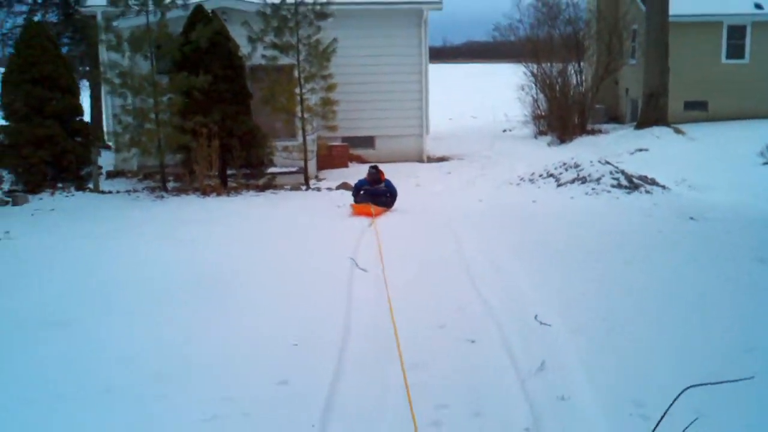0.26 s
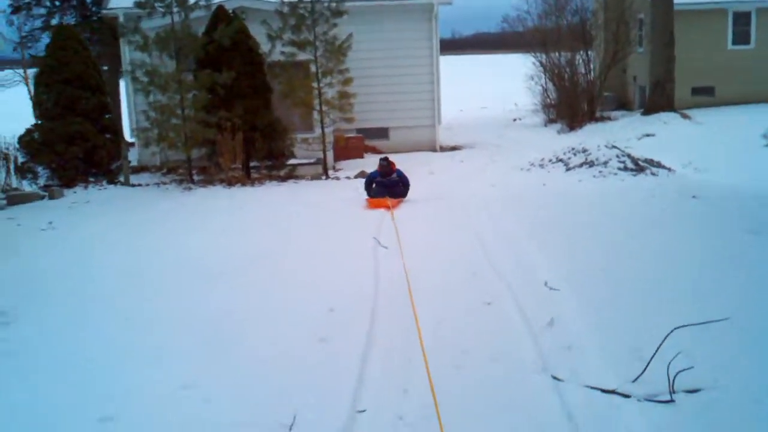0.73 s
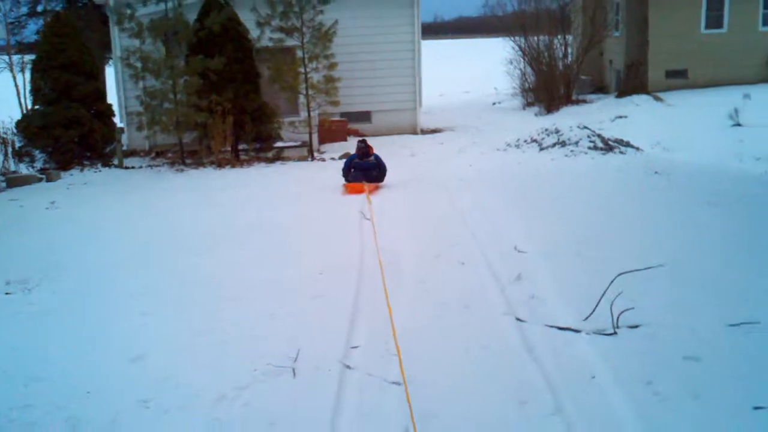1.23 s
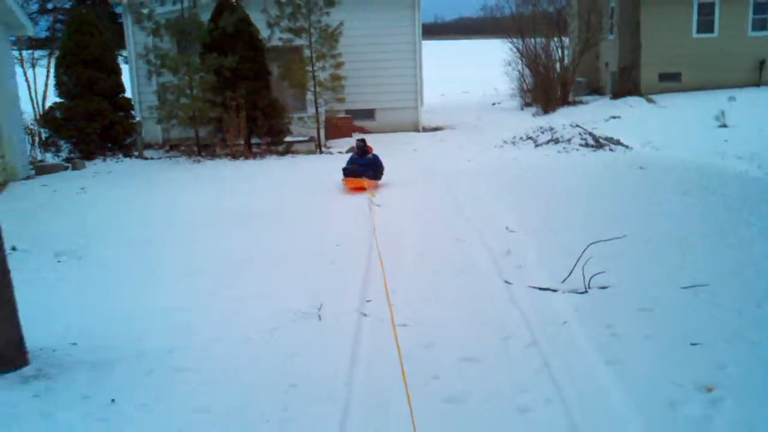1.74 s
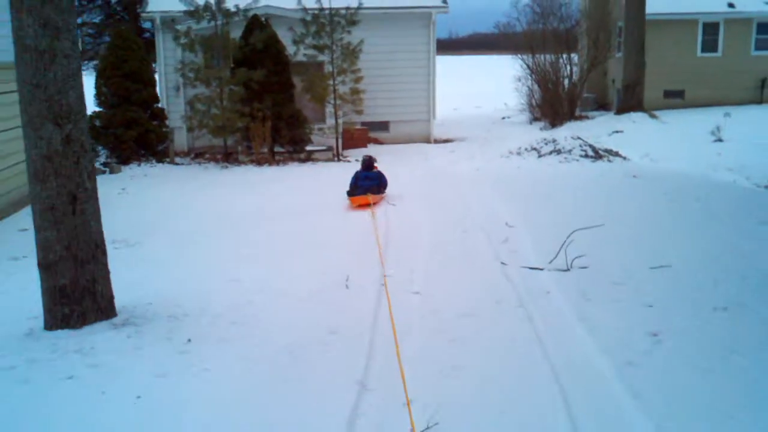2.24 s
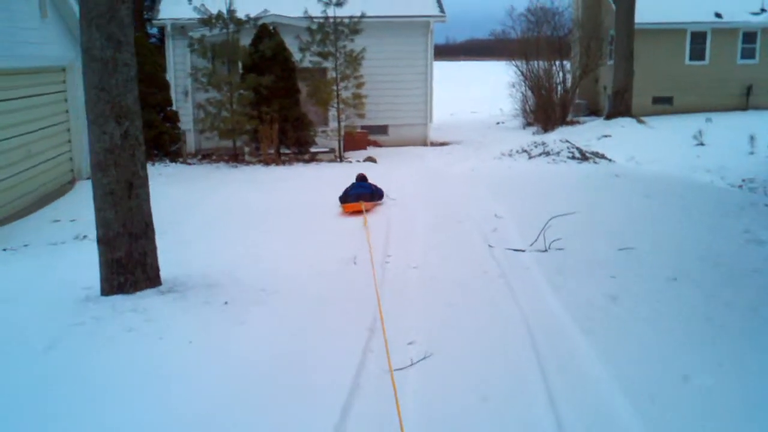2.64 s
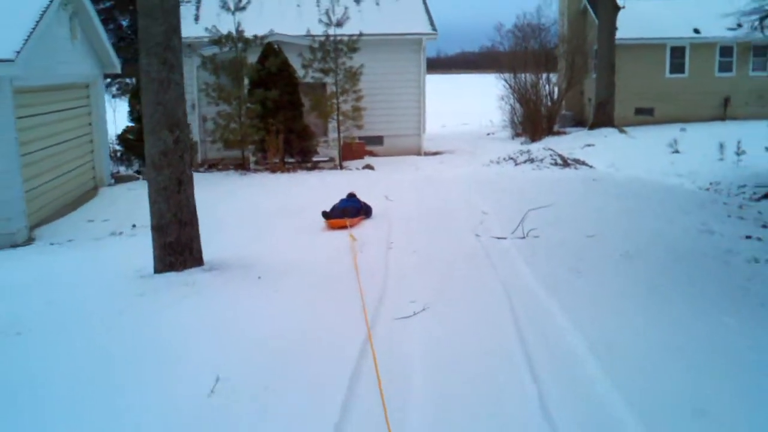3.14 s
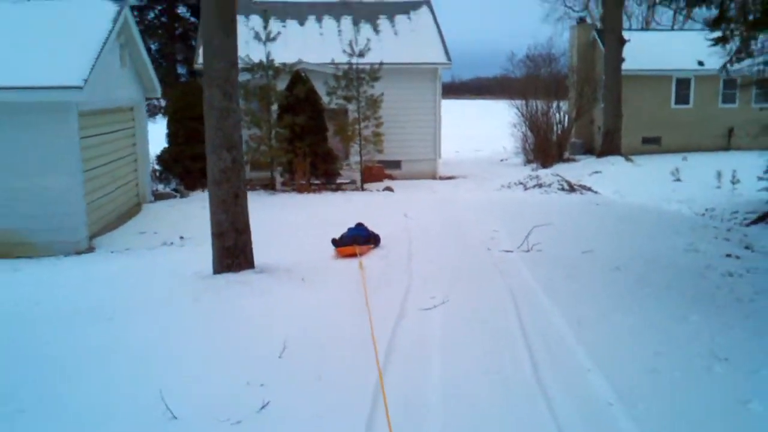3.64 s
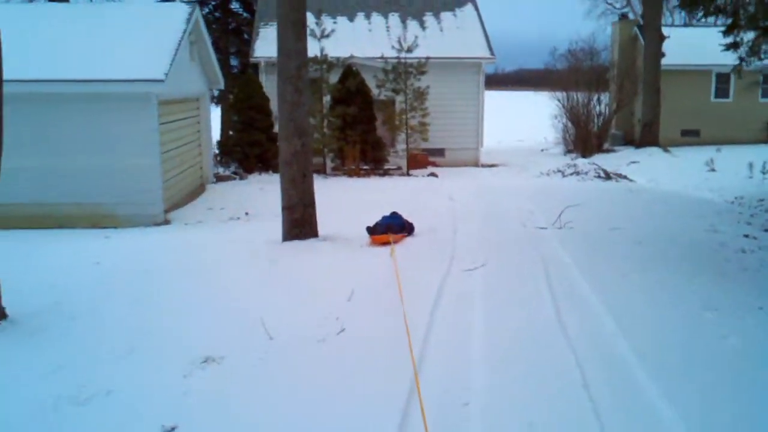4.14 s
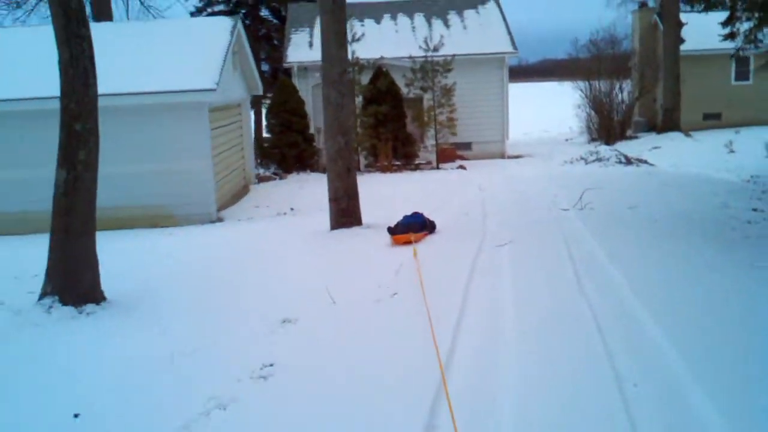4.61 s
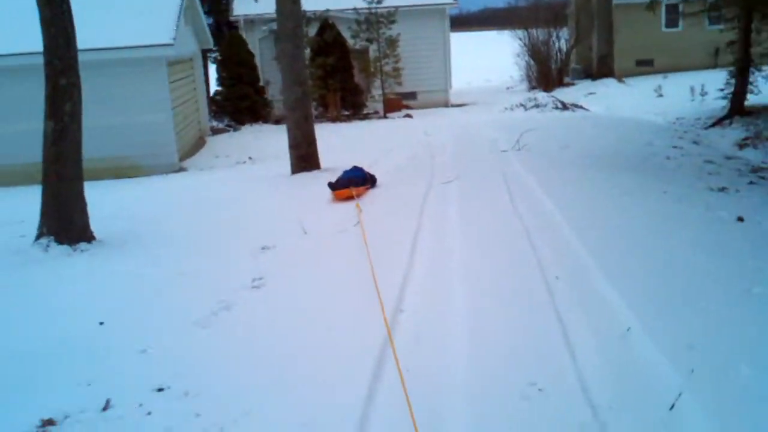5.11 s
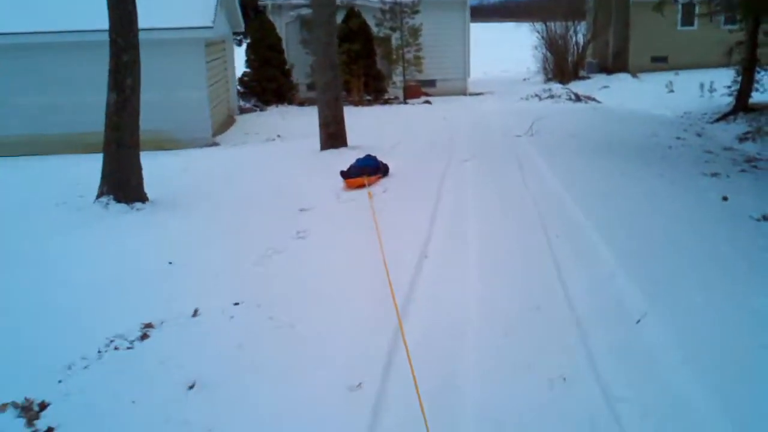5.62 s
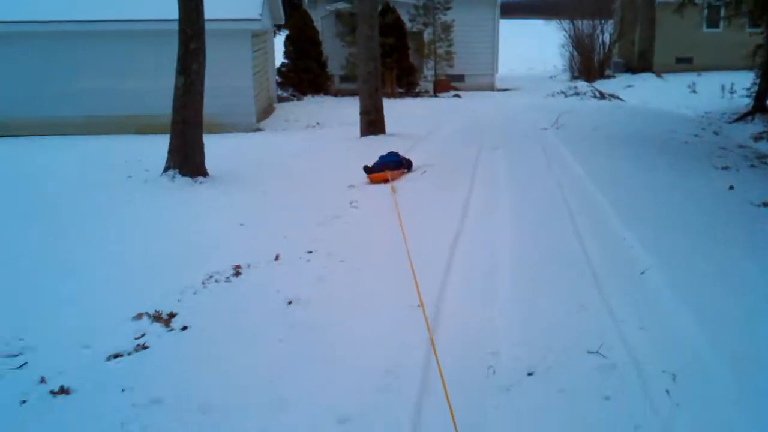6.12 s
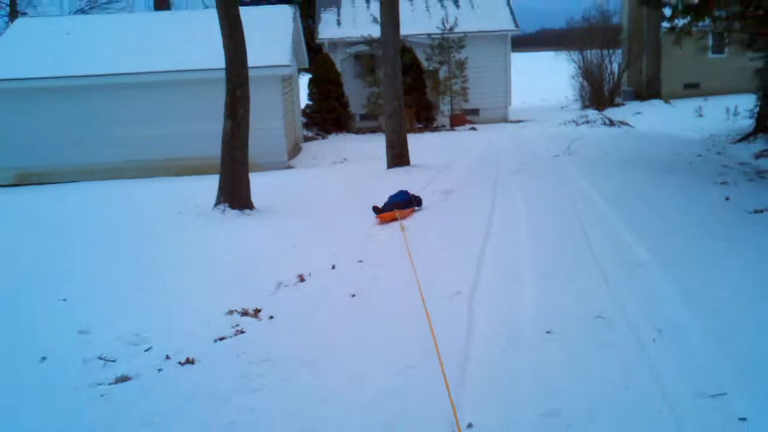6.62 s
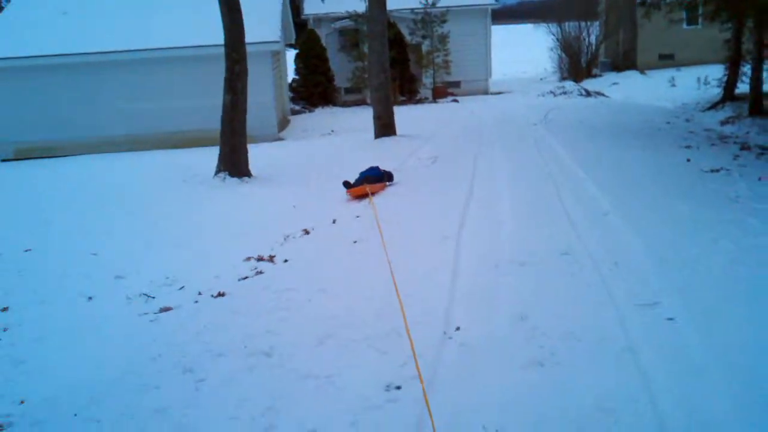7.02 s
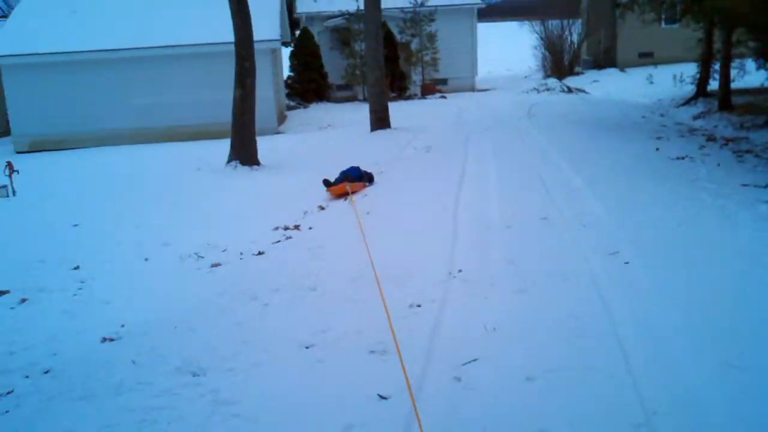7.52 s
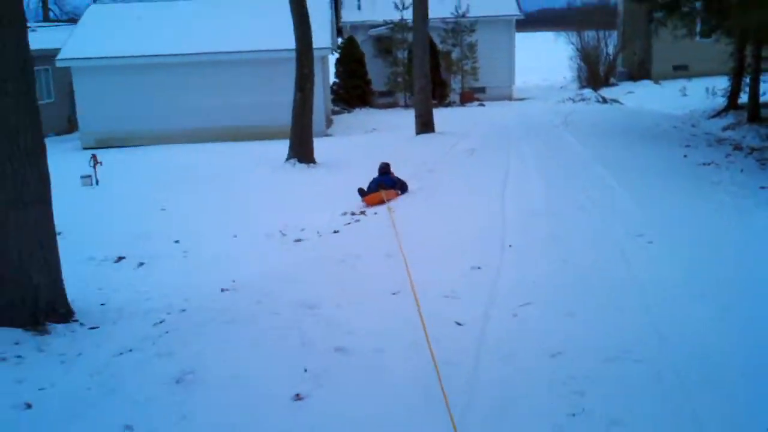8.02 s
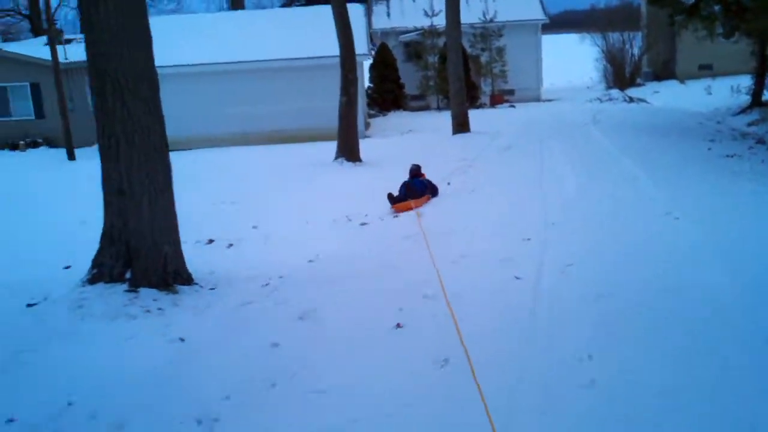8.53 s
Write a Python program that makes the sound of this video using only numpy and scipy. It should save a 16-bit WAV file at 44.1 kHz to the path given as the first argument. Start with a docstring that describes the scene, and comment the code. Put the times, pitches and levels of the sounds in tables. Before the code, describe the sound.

Outdoors on snow, a little cart engine chugs with rapid low pops and rattling, its speed rising and easing over faint icy hiss and early rumbling.

```python
"""Golf cart towing a sled

A single-cylinder golf cart tows a sled over snow, heard from its back, with the snow hissing and cracking.
Snow, rushing gas and a low rumble are shaped noise; dull thumps of wind or handling are ringing clicks.
The engine clatters with clicks and noise, and the drive belt is noise that swishes once a cycle.
Every cycle, clicks for an exhaust pop and a gulp of air ring in the pipes and the engine bay."""
import sys
import numpy as np
from scipy import signal
from scipy.fft import rfft, irfft
from scipy.io import wavfile
from scipy.ndimage import map_coordinates

SR = 44100
rng = np.random.default_rng(int(sys.argv[2]) if len(sys.argv) > 2 else 0)


def pcm_store(signal):
    """Save signal as 16-bit PCM."""
    levels = np.round(np.clip(np.atleast_2d(signal), -1, 1) * 32767)
    wavfile.write(sys.argv[1], SR, levels.astype(np.int16).T)


N = 386316
TIME = np.arange(N) / SR
BINS = np.maximum(np.arange(N // 2 + 1) * SR / N, 1)  # Hz

# Snow hiss spectrum: f/Hz, relative mid level/dB, relative side level/dB
SNOW_SPECTRUM = [(1530, -57, -1), (3150, -1.5, -1), (3930, -1.5, -2), (5070, -3, -4), (6430, 3, 4.5),
                 (7820, 7.5, 5.5), (9200, 4, 5.5), (11000, 4.5, 2), (12700, -2, 2), (14400, 0, -4.5)]
# Tyres break through crusted snow: t/s, half length/s, level over the plain hiss/dB
CRUNCHES = [(0.375, 0.082, 3.5), (0.965, 0.088, 1.5), (1.18, 0.045, 5), (1.756, 0.014, 6), (2.19, 0.89, 2),
            (4.65, 0.36, 1.5), (8.123, 0.16, 2.5)]
# Low rumble of wind or handling, in bursts until about 4.8 s, then quiet but for one burst near 8 s:
# t/s, base level/dB
RUMBLE_LEVEL = [(0, -24.5), (.25, -32), (.48, -23), (.8, -30), (1.15, -29), (1.3, -32), (1.68, -34),
                (1.82, -27), (2.04, -33), (2.38, -26.5), (2.72, -30.5), (3.0, -25.5), (3.6, -28),
                (3.82, -36), (4.7, -35), (4.9, -38), (7.85, -53), (7.97, -39), (8.15, -46), (8.76, -42)]
# Rumble spectrum: f/Hz, relative mid level/dB, relative side level/dB
RUMBLE_SPECTRUM = [(20, -60, -30), (45.4, -56, -34), (85, -26, -9.5), (148, -12, -7.5), (201, -14, -7),
                   (282, -22, -14), (450, -22, -33), (774, -61, -48), (2000, -73, -72)]
# Dull thumps of wind or handling: t/s, relative level/dB, hardness (extra level in the top resonance)/dB
THUMPS = [(0.041, -15, -7), (.459, -9.5, 3.5), (.508, -17, -15), (.547, -19, 1), (.693, -24, -19),
          (1.12, -26, -12), (1.355, -9, -16), (1.741, -14, -5), (1.809, -18, -8), (1.863, -15, -10),
          (1.907, -18, -15), (2.252, -13, -21), (2.359, -12, -7), (2.522, -5.5, -17), (2.58, -15, 4),
          (2.966, -22, -16), (3.018, -12, -4), (3.308, -23, -15), (3.441, -9, 0), (3.658, -12, -14),
          (3.731, -21, -18), (3.926, -26, -12), (4.019, -24, 5), (4.064, -21, -13), (4.211, -26, -15),
          (4.345, -20, -14), (4.416, -15, -14), (4.546, -18, -11), (4.586, -20, 3), (4.697, -32, -17),
          (4.74, -27, 0)]
# Resonances of the thumps: f/Hz, width/Hz, relative left level/dB, relative right level/dB
THUMP_MODES = [(121, 89, 0, -7), (183, 85, -1.5, -1), (360, 54, 5, -3.5)]
# Belt swish, strongest while the cart picks up speed: t/s, level/dB
BELT_SLIP = [(0, -60), (.3, -55), (.38, -52.5), (1.05, -47.5), (1.35, -55.5), (1.8, -53.5), (3.3, -55.5),
             (7.7, -54), (8.2, -54), (8.76, -55)]
# Belt spectrum: f/Hz, relative mid level/dB, relative side level/dB
BELT_SPECTRUM = [(3140, -14, -24), (5300, -16, -15), (7100, -7, -4), (9150, -7.5, -8), (10270, 7, 10),
                 (10240, -6.5, -6), (12200, -8.5, -12), (14000, -12.5, -10)]
# Knocks of piston and valves: angle/cycles, level over a gear contact/dB
KNOCKS = [(.05, -4), (.45, -3), (.69, 2.5), (.89, 2)]
# Clatter spectrum: f/Hz, relative mid level/dB, relative side level/dB
CLATTER_SPECTRUM = [(193, -19, -29), (254, 3.5, -21), (322, 5.5, 3), (502, 12, -1.5), (614, -1.5, 2.5),
                    (685, 4, -2.5), (800, 1.5, -8), (1067, -1.5, -12), (1184, -6.5, -17.5),
                    (1700, -11, -9.5), (2267, -11, -10), (2870, -47, -25), (2925, -9.5, -3),
                    (2990, -21.5, -15.5), (5230, -38.5, -41)]
# Engine speed: t/s, firing rate/Hz
ENGINE_SPEED = [(0.0, 16.54), (0.26, 14.878), (0.38, 14.627), (0.62, 15.138), (0.92, 17.682),
                (1.04, 18.645), (1.58, 23.07), (1.94, 24.476), (2.3, 24.991), (2.72, 24.274), (2.9, 23.482),
                (3.2, 22.687), (3.26, 22.182), (3.74, 20.468), (3.92, 20.507), (4.04, 20.111),
                (4.46, 19.823), (4.7, 19.54), (5.0, 19.655), (5.06, 19.966), (5.18, 19.131), (5.24, 19.546),
                (5.36, 19.462), (5.48, 20.117), (5.72, 20.005), (5.84, 20.348), (6.02, 21.223),
                (6.26, 21.111), (6.32, 21.549), (6.74, 22.032), (6.92, 21.881), (7.22, 22.044),
                (7.34, 21.282), (7.64, 20.922), (7.94, 19.958), (8.06, 20.258), (8.12, 19.69),
                (8.42, 20.307), (8.66, 20.356), (8.76, 20.206)]
# Strength of the two strokes (the pop follows the throttle):
# t/s, relative exhaust pop level/dB, relative intake gulp level/dB
THROTTLE = [(0, 0.5, 4.5), (.65, 0, 2), (1.05, 4.5, 3.5), (1.55, 3, 0.5), (1.95, -4, 7.5), (2.8, 1, 2.5),
            (3.3, -3, 1), (3.6, 1.5, 2), (4.5, 1.5, 5.5), (5.4, 4.5, 3), (6.1, 3, 4), (7.2, 2.5, 5.5),
            (8.76, 0.5, 6)]
# Under load the exhaust barks: t/s, extra level of the resonances above BARK_HZ/dB
BARK = [(0, -2), (.7, 0), (1.15, 2), (1.5, 2.5), (1.9, 0.5), (3.1, 0), (3.55, 3), (4.3, 0.5), (5.25, 2),
        (6.2, 0.5), (7.0, 1), (7.35, 3), (8.0, 1), (8.76, 1.5)]
# Pipe and engine bay resonances; a negative gain swings the opposite way:
# f/Hz, width/Hz, pop gain left, pop gain right, gulp gain left, gulp gain right
BAY_MODES = [(126.7, 98, -0.79, -0.47, 0.22, 0.31), (166.9, 14, -0.81, 0.36, -1.66, -1.1),
             (177.6, 23.2, -0.22, 0.71, 5, 3), (188, 12, 0.051, 0.84, -1.4, -3.5),
             (208.3, 18.6, -0.72, -1.3, 1.04, 1.61), (231.1, 45, 1.8, 1.79, -1, -1),
             (337.2, 24.5, 1.53, 1.4, -0.44, 0), (400, 21.3, 1.03, 1.29, -0.17, 0),
             (462.8, 12.8, -0.1, 0.16, 0.02, 0.24), (495.7, 17, -.02, -0.19, 0.4, 0.38),
             (680.3, 25, 0.56, 0.53, 0.34, 0.14)]
# Stereo widening: f/Hz, share of the other channel taken away
CROSSFEED = [(800, 0.0031), (2400, 1), (3000, 1), (5200, 0.46), (7800, 0.24), (13000, 0.059)]

# Snow hiss: base level, how far it wanders, and fresh random targets per second
SNOW_DB, SNOW_WANDER_DB, SNOW_WANDERS_PER_S = -50, 0.5, 7
# Cracking crust: level at cruising speed, grains per second over all pitches,
# pitch divided by resonance width, and slope over pitch
GRIT_DB, GRITS_PER_S, GRIT_SHARPNESS, GRIT_DB_PER_OCTAVE = -51, 420, 35, -3.5
# Each thump brings a decaying rumble: level relative to the thump, and decay time
AFTER_RUMBLE_DB, AFTER_RUMBLE_S = -17, 0.055
# Firings per second at cruising speed; slopes "per Hz" count from here
CRUISE_HZ = 20
# Place in the engine cycle at the start
START_CYCLE = -.009
# The engine runs a little ahead or behind: how far, and fresh random targets per second
WAVER_CYCLES, WAVERS_PER_S = .002, 7
CLATTER_DB, CLATTER_DB_PER_HZ = -36.5, 0.19
# Rush of exhaust gas: base level, swing over a cycle, and the tailpipe resonance
PUFF_DB, PUFF_SWING_DB, PUFF_HZ, PUFF_WIDTH_HZ = -43, 0.5, 450, 183
# Base level of both strokes, and the random spread of the pops
STROKE_DB, FIRING_SPREAD_DB = 19.5, 0.96
# Angles in cycles at cruising speed; the advance in cycles per Hz brings strokes earlier at higher speed
POP_ANGLE, POP_ADVANCE, GULP_ANGLE, GULP_ADVANCE = .001, .0059, .2714, .008
# Part of each stroke arrives straight, without ringing: gains
DIRECT_POP, DIRECT_GULP = -.2, 0.05
# The exhaust port takes a moment to open: the strokes are softened above this
PORT_HZ = 592
# Hotter gas at higher speed raises the resonances: power of the speed
HEAT_POWER = 0.097
BARK_HZ = 300
CROSSFEED_S, CUTOFF_HZ = .000385, 14050


def from_db(db):
    """Turn decibels into gain."""
    return 10 ** (np.asarray(db) / 20)


def rms_one(x):
    """Scale to an average strength (rms) of one."""
    return x / np.sqrt(np.mean(x ** 2) + 1e-20)


def in_time(rows):
    """Draw one curve over time for each table column after the first."""
    s, *columns = np.transpose(rows)
    return [np.interp(TIME, s, column) for column in columns]


def in_hz(rows):
    """Draw one curve over pitch for each table column after the first."""
    hz, *columns = np.transpose(rows)
    return [np.interp(np.log(BINS), np.log(hz), column) for column in columns]


def cut(x, hz, kind, order=2):
    """Keep what lies below (low) or above (high) a frequency."""
    sections = signal.butter(order, hz, kind, fs=SR, output="sos")
    return signal.sosfilt(sections, x + 1e-18)


def drift(rate):
    """Wander smoothly between random targets, rate of them per second, with a spread of one."""
    targets = rng.standard_normal(400)
    return rms_one(map_coordinates(targets, [TIME * rate], order=2, mode="wrap"))


def clicks(times, heights):
    """Place single-sample clicks at the given moments."""
    out = np.zeros(N)
    inside = (times >= 0) & (times < TIME[-1])
    np.add.at(out, (times[inside] * SR).astype(int), heights[inside])
    return out


def resonate(x, hz, width_hz):
    """Ring at a fixed pitch, with a gain of one at the peak."""
    r = np.exp(-np.pi * width_hz / SR)
    feed = np.array([1, 0, -1]) * (1 - r * r) / 2
    feedback = [1, -2 * r * np.cos(2 * np.pi * hz / SR), r * r]
    return signal.lfilter(feed, feedback, x + 1e-18)


def ring(x, modes):
    """Add resonances side by side, each with its own left and right level."""
    return sum(resonate(x, hz, width) * from_db([[left], [right]])
               for hz, width, left, right in modes)


def pipe(x, hz, width_hz):
    """Ring on from stroke to stroke while the pitch moves, with a gain of one at the peak."""
    turn = np.exp(2j * np.pi * np.cumsum(hz) / SR)
    r = np.exp(-np.pi * width_hz / SR)
    # shift the pitch down to zero, smooth there, then shift back up
    smooth = signal.lfilter([1 - r], [1, -r], x * turn.conj() + 1e-18)
    return 2 * np.real(turn * smooth)


def colour(pair, spectrum):
    """Shape two signals into mid and side, and give left and right with a joint rms of one."""
    mid, side = irfft(rfft(pair) * from_db(in_hz(spectrum)), N)
    return rms_one(np.array([mid + side, mid - side]))


def each_cycle(cycles, angle, spread_db, jitter_s):
    """Click whenever the engine passes an angle (in cycles), with random strength and timing."""
    times = np.interp(np.arange(200) + angle, cycles, TIME, left=-1, right=-1)
    size, late = rng.standard_normal((len(times), 2)).T
    return clicks(times + jitter_s * late, from_db(spread_db * size))


def rumble_and_thumps():
    """Wind or handling rumbles and thumps at the microphones; each thump brings a decaying rumble."""
    rumble_db, = in_time(RUMBLE_LEVEL)
    times, level_db, hard_db = np.transpose(THUMPS)
    hits = clicks(times, from_db(level_db))
    hard_hits = clicks(times, from_db(level_db + hard_db))
    decays = signal.lfilter([1], [1, -np.exp(-1 / (AFTER_RUMBLE_S * SR))], hits)
    strength = np.hypot(from_db(rumble_db), from_db(AFTER_RUMBLE_DB) * decays)
    rumble = colour(rng.standard_normal((2, N)), RUMBLE_SPECTRUM) * strength
    rumble = rumble * from_db(3.16 * drift(rate=40))
    thumps = (ring(hits, THUMP_MODES[:2]) + ring(hard_hits, THUMP_MODES[2:])) * from_db(36.5)
    left, right = cut(thumps, hz=493, kind="low", order=4)
    # a thump swings opposite ways in left and right
    return rumble + cut(np.array([-left, right]), hz=70, kind="high")


def snow():
    """Tyres and sled crush countless grains; coarse and fine noise come in patches of their own."""
    coarse, fine = (colour(rng.standard_normal((2, N)) * from_db(3.0 * rng.standard_normal(N)), SNOW_SPECTRUM)
                    for _ in range(2))
    coarse = cut(coarse, hz=5900, kind="low", order=3)
    fine = cut(fine, hz=5600, kind="high", order=3)
    return coarse * from_db(2.0 * drift(rate=38)) + fine * from_db(1.54 * drift(rate=43))


def grit(count=16):
    """Bits of icy crust crack under the tyres; each rings briefly at one of several pitches."""
    out = 0
    for hz in np.geomspace(750, 2100, count):
        size = from_db(2.5 * np.minimum(rng.exponential(1, N), 3))
        cracks = size * (rng.random(N) < GRITS_PER_S / count / SR)
        ringing = rms_one(resonate(cracks, hz, hz / GRIT_SHARPNESS))
        out = out + ringing * from_db(GRIT_DB_PER_OCTAVE * np.log2(hz))
    return rms_one(out)


def belt(cycles):
    """The belt slips and swishes once a cycle, while the piston slows against compression."""
    slip = from_db(6.0 * np.cos(2 * np.pi * (cycles - .76)) + 1.6 * drift(rate=30))
    return colour(rng.standard_normal((2, N)) * slip, BELT_SPECTRUM)


def clatter(cycles, over_hz, count=32):
    """Parts knock at set angles, more clearly at high speed, over a rush swelling twice a cycle."""
    angles = (np.arange(count) + rng.random((2, count))) / count
    gears = np.array([
        sum(rng.choice([-1, 1]) * each_cycle(cycles, angle, spread_db=2.0, jitter_s=.00004) for angle in row)
        for row in angles])
    knocks = sum(from_db(db) * each_cycle(cycles, angle, spread_db=3.5, jitter_s=.00004)
                 for angle, db in KNOCKS)
    # the first signal becomes the mid, the second the side
    contacts = rms_one(np.array([gears[0] + knocks, gears[1]])) * from_db(2.5 + .6 * over_hz)
    swell_db = 0.88 * np.cos(4 * np.pi * (cycles - .02)) + 2.0 * drift(rate=36)
    rush = rng.standard_normal((2, N)) * from_db(swell_db)
    return colour(contacts + rush, CLATTER_SPECTRUM)


def puffs(cycles):
    """Turbulent gas rushes through the tailpipe, follows the throttle and swells slightly each cycle."""
    throttle_db, _ = in_time(THROTTLE)
    gas = rng.standard_normal(N) * from_db(PUFF_SWING_DB * np.cos(2 * np.pi * (cycles - .08)))
    for _ in range(2):
        gas = resonate(gas, PUFF_HZ, PUFF_WIDTH_HZ)
    return rms_one(gas) * from_db(PUFF_DB + 0.91 * throttle_db)


def strokes(cycles, over_hz):
    """Pop and gulp, over a quarter cycle apart, ring the same resonances, which rise with speed."""
    pop_db, gulp_db = in_time(THROTTLE)
    pop = each_cycle(cycles + POP_ADVANCE * over_hz, POP_ANGLE, spread_db=FIRING_SPREAD_DB, jitter_s=.00005)
    gulp = each_cycle(cycles + GULP_ADVANCE * over_hz, GULP_ANGLE, spread_db=0.85, jitter_s=.00005)
    # the exhaust valve cracks open a moment before the pop
    leak = each_cycle(cycles, angle=.84, spread_db=2.5, jitter_s=0.00027) * from_db(-14)
    pop = (leak + pop) * from_db(STROKE_DB + pop_db)
    gulp = gulp * from_db(STROKE_DB + gulp_db)
    heat = (1 + over_hz / CRUISE_HZ) ** HEAT_POWER
    bark = from_db(in_time(BARK)[0])
    out = DIRECT_POP * pop + DIRECT_GULP * gulp
    for hz, width, pop_left, pop_right, gulp_left, gulp_right in BAY_MODES:
        push = np.outer([pop_left, pop_right], pop) + np.outer([gulp_left, gulp_right], gulp)
        gain = bark if hz > BARK_HZ else 1
        out = out + gain * pipe(push, hz * heat, width)
    out = cut(out, hz=PORT_HZ, kind="low", order=4)
    return cut(out, hz=95, kind="high", order=4)


def scene():
    """Engine sounds follow the count of its cycles; the snow swells at each crunch."""
    speed, = in_time(ENGINE_SPEED)
    cycles = START_CYCLE + np.cumsum(speed) / SR + WAVER_CYCLES * drift(WAVERS_PER_S)
    over_hz = speed - CRUISE_HZ

    crunch_db = sum(db * np.exp(-((TIME - s) / half) ** 2) for s, half, db in CRUNCHES)
    snow_db = SNOW_DB + crunch_db + SNOW_WANDER_DB * drift(SNOW_WANDERS_PER_S)
    ground = from_db(snow_db) * snow() + from_db(GRIT_DB + .5 * over_hz) * grit()

    belt_db, = in_time(BELT_SLIP)
    clatter_db = CLATTER_DB + CLATTER_DB_PER_HZ * over_hz
    machinery = from_db(belt_db) * belt(cycles) + from_db(clatter_db) * clatter(cycles, over_hz)
    return rumble_and_thumps() + ground + machinery + puffs(cycles) + strokes(cycles, over_hz)


def record(dry):
    """Widen the treble by taking the delayed other channel from each, then cut the top."""
    share, = in_hz(CROSSFEED)
    spectrum = rfft(dry)
    delay = np.exp(-2j * np.pi * BINS * CROSSFEED_S)
    wide = irfft(spectrum - np.clip(share, 0, 1) * delay * spectrum[::-1], N)
    top_cut = signal.ellip(12, .1, 80, CUTOFF_HZ, fs=SR, output="sos")
    return signal.sosfilt(top_cut, wide)


dry = scene()
out = record(dry)
pcm_store(out)
```